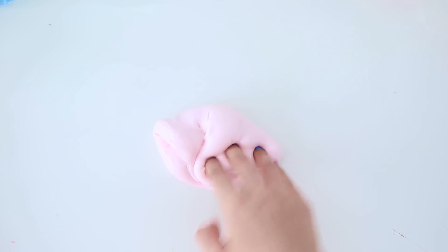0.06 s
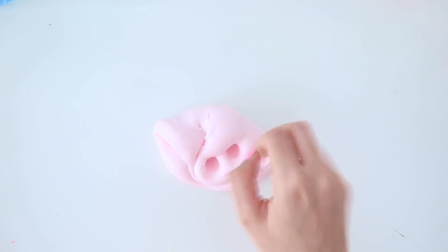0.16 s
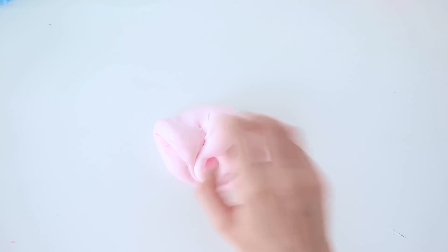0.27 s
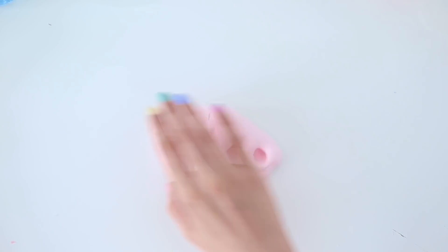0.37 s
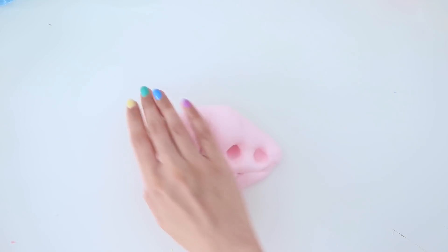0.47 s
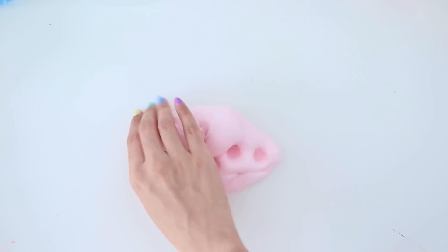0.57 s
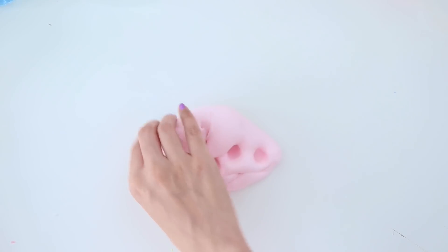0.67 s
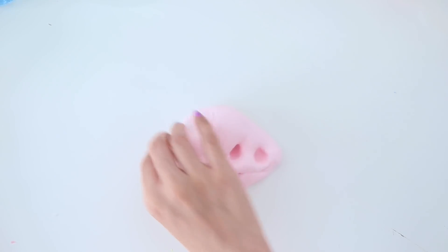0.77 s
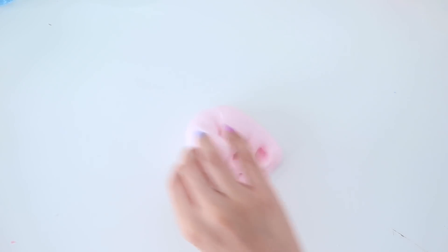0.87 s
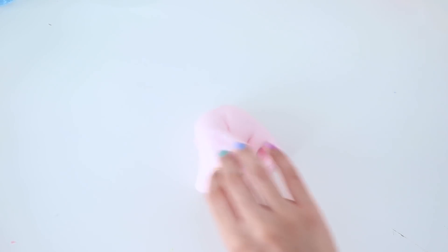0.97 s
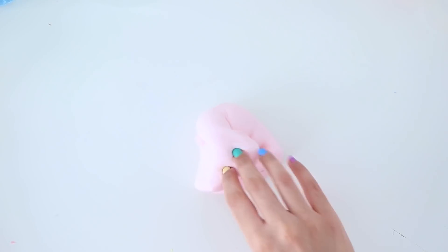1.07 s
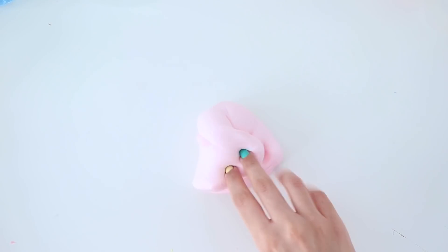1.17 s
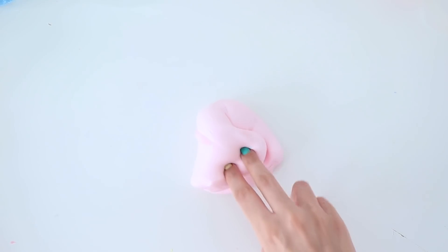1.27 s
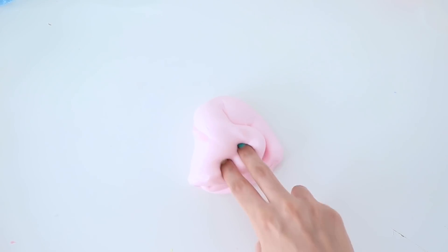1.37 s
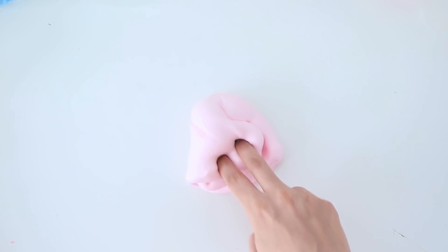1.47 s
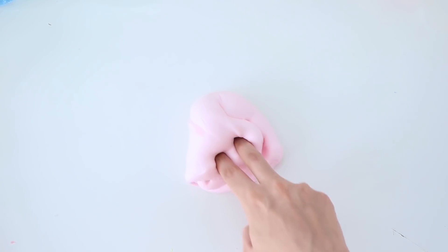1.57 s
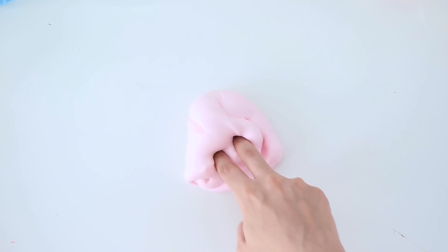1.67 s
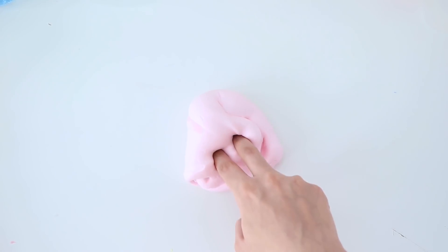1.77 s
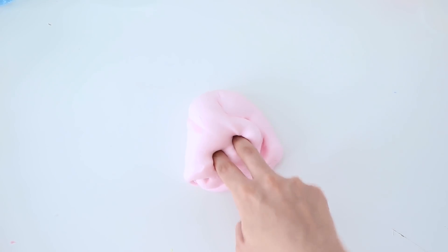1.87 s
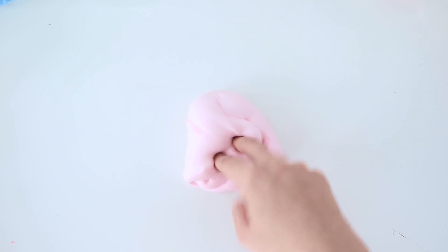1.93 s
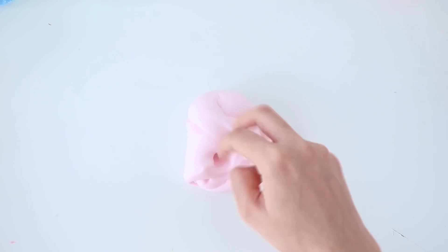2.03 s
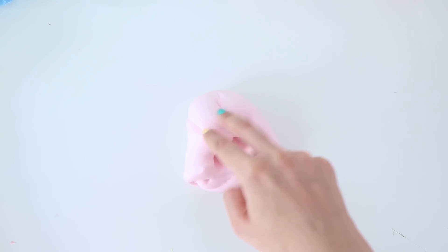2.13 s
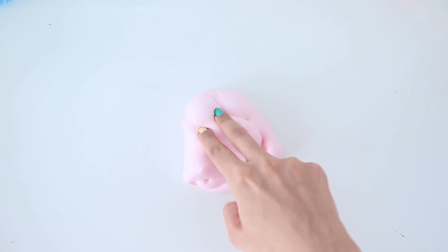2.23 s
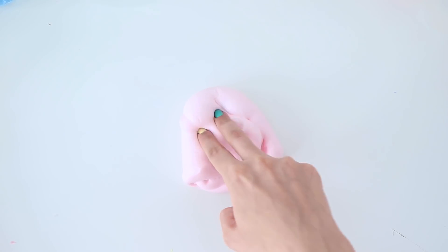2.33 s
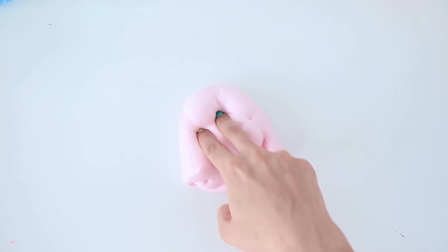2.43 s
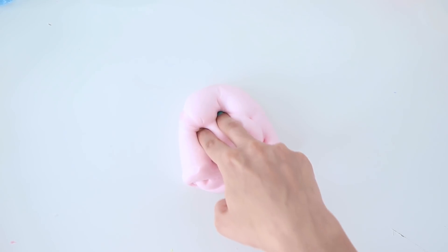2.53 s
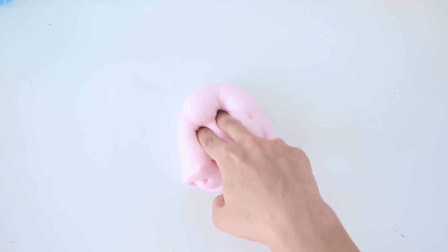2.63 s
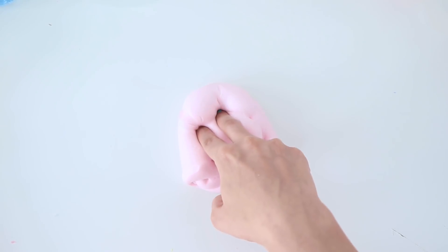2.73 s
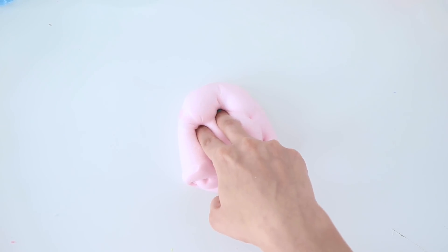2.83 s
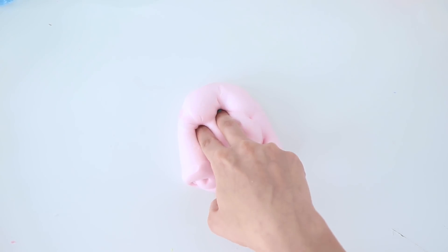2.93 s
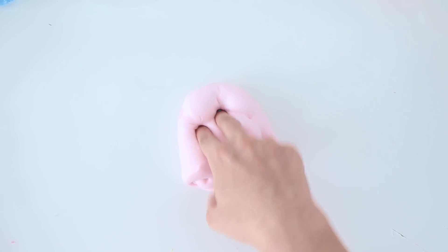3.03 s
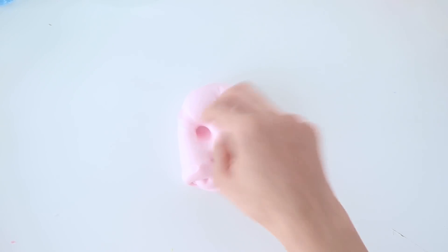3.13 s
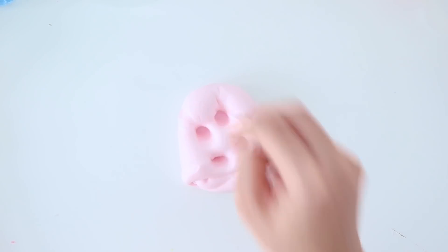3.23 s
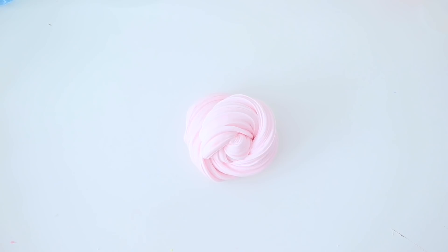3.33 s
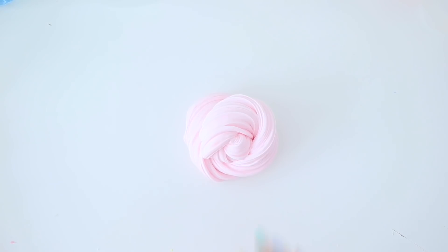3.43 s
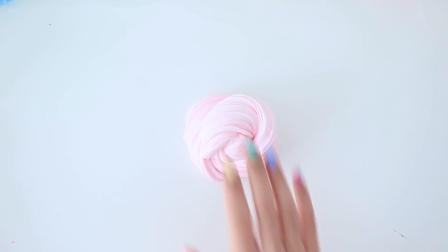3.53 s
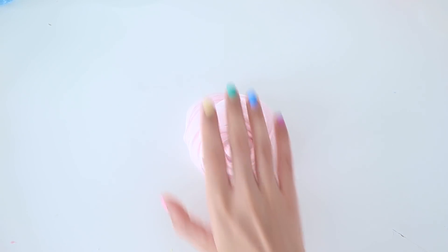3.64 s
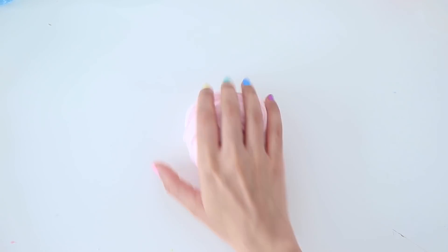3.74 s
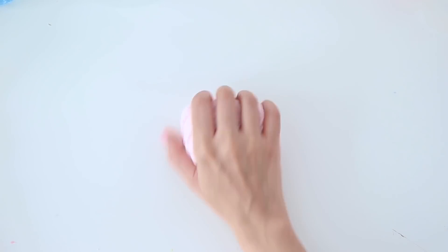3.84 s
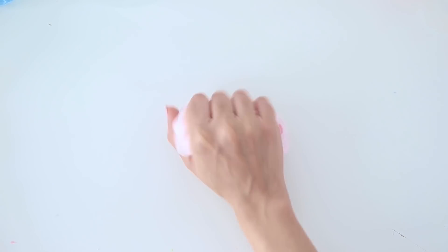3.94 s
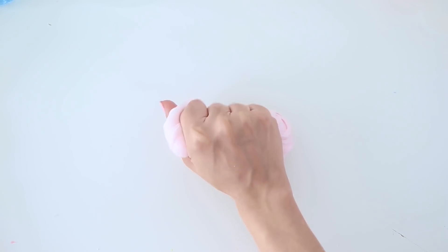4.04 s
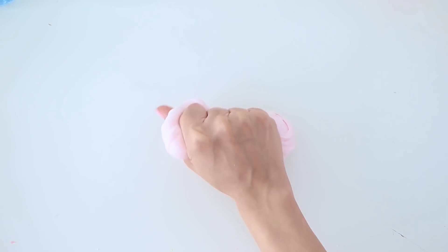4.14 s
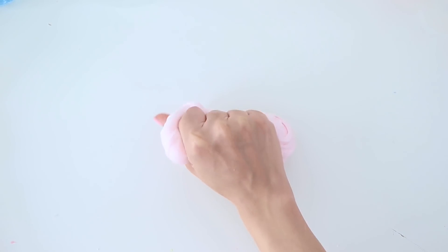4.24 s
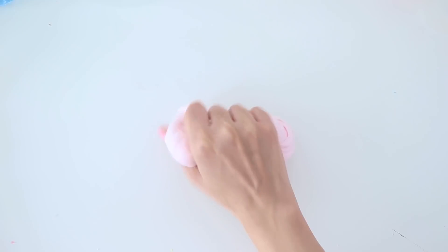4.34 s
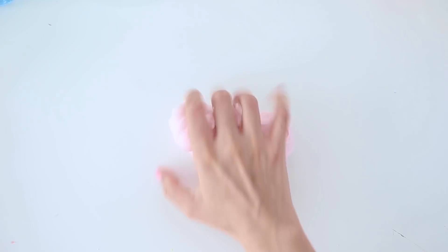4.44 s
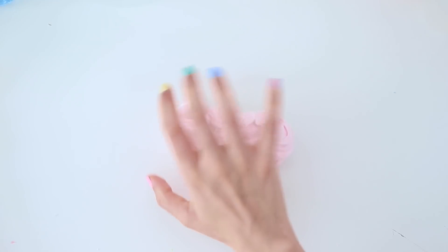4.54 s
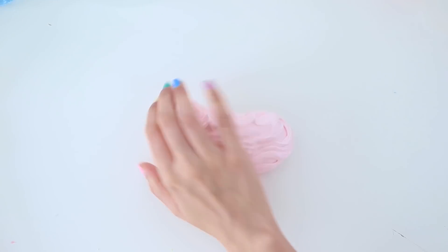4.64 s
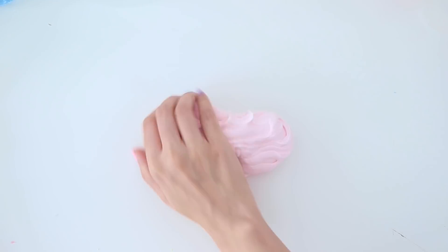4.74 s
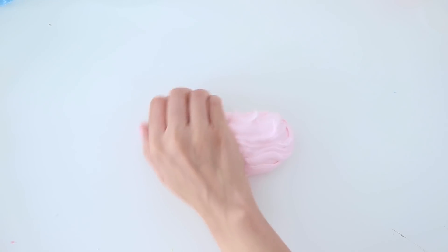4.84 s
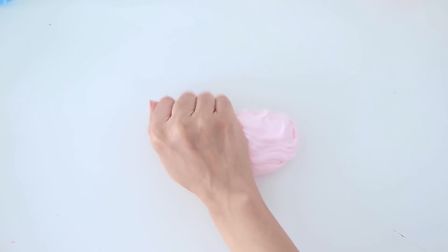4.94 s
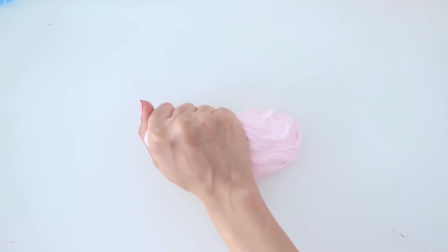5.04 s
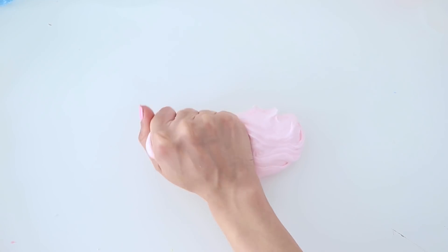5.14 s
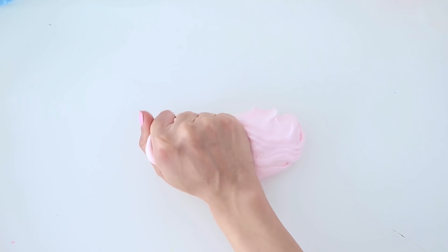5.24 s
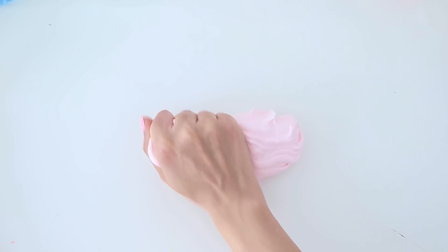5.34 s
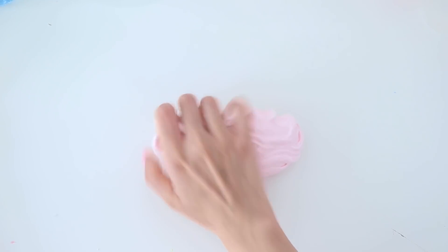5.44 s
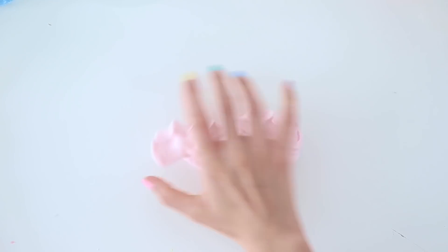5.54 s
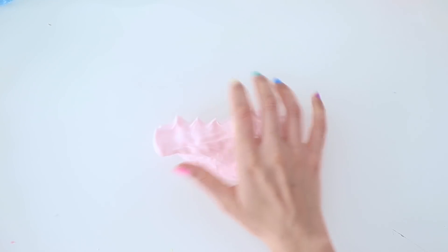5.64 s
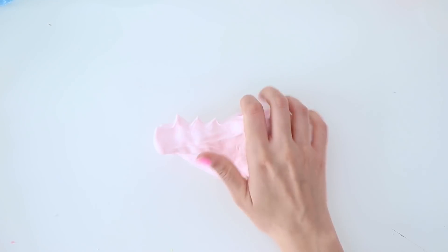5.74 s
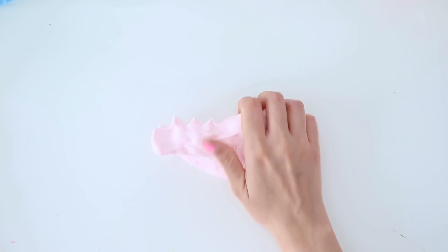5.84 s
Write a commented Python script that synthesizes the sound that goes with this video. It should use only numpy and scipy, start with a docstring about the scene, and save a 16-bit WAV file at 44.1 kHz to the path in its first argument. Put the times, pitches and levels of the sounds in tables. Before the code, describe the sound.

Close wet squelches and bursting air pockets from kneaded slime, sparse at first then dense and snappy, with soft tabletop thuds and faint mains hum.

```python
"""Slime squeezed on a hollow table.

A hand pokes, squeezes and peels soft slime close to a microphone. Air pockets burst as short gliding
rings with noisy cracks; smearing strokes swell a hiss of random tears and plops; finger holes hiss
through resonances. Fingertips knock decaying table modes, the table rocks as low resonant noise, and
a steady mains tone with two faint whines lies over coloured air noise in a small echoing room."""
import sys
import numpy as np
from scipy import signal
from scipy.fft import rfft, irfft
from scipy.io import wavfile
from scipy.ndimage import uniform_filter1d

SR = 44100
rng = np.random.default_rng(int(sys.argv[2]) if len(sys.argv) > 2 else 0)


def generate_wav(signal):
    """Clip the signal to [-1, 1] and save it as 16-bit WAV at the path in sys.argv[1]."""
    frames = np.transpose(np.atleast_2d(signal))
    scaled = np.clip(frames, -1, 1) * 32767
    pcm = np.round(scaled).astype(np.int16)
    wavfile.write(sys.argv[1], SR, pcm)


N = 260175


def gain_of(db):
    """Amplitude factor of a level in dB."""
    return 10 ** (np.asarray(db) / 20)


def evened(x):
    """Scales x to rms 1."""
    return x / np.sqrt(np.mean(x ** 2) + 1e-20)


def read(points, hz):
    """Interpolates a (Hz, value) table over log frequency."""
    point_hz, value = np.transpose(points)
    return np.interp(np.log(hz + 1), np.log(point_hz + 1), value)


def add(mix, start_s, sound):
    """Adds a sound into the mix in place, cut at the end."""
    part = mix[round(start_s * SR):][:len(sound)]
    part += sound[:len(part)]


def coloured(x, db_of_hz):
    """Shapes the spectrum of x by a dB curve over frequency."""
    hz = np.fft.rfftfreq(len(x), 1 / SR)
    return irfft(rfft(x) * gain_of(db_of_hz(hz)), len(x))


def resonate(x, hz, width_hz):
    """One resonance of gain 1, from a complex pole."""
    pole = np.exp((2j * np.pi * hz - np.pi * width_hz) / SR)
    return 2 * signal.lfilter([1 - abs(pole)], [1, -pole], x).real


def swell(peak_s, rise_s, hold_s, fall_s):
    """Climbs 30 dB in the rise time, holds, and sinks 30 dB in the fall time."""
    t = np.arange(N) / SR
    before = (peak_s - t) / rise_s
    after = (t - peak_s - abs(hold_s)) / fall_s
    return gain_of(-30 * np.maximum(np.maximum(before, after), 0))


# Spectrum of the air noise. Each row: frequency in Hz, relative density in dB per Hz.
AIR_SPECTRUM = [(25, -21.5), (55, 0.5), (85, -7), (105, -17), (180, -12), (205, -6), (235, -13.5),
                (400, -24), (1000, -31), (1400, -34.5), (5000, -40.5), (13500, -45.5), (14500, -46.5),
                (16000, -79.5)]
# Pitches of the faint whines, in Hz.
WHINES_HZ = [985, 1408]
MAINS_HZ = 120.1
AIR_RMS_DB, HUM_RMS_DB, WHINE_RMS_DB = -61.5, -54.5, -88.5  # the last for each whine


def background():
    """Smooth air noise under a steady mains sine and two whines of narrow-band noise."""
    t = np.arange(N) / SR
    air = evened(coloured(rng.standard_normal(N), lambda f: read(AIR_SPECTRUM, f)))
    hum = np.sqrt(2) * np.sin(2 * np.pi * MAINS_HZ * t)
    whines = sum(evened(resonate(rng.standard_normal(N), hz, 5.7)) for hz in WHINES_HZ)
    return gain_of(AIR_RMS_DB) * air + gain_of(HUM_RMS_DB) * hum + gain_of(WHINE_RMS_DB) * whines


# Swells of the table's low rocking on its legs. Each row: peak in seconds, rise in seconds, fall in seconds,
# level in dB.
SWAYS = [(.1, 0.13, 0.16, -40), (.57, 0.47, 1.7, -57), (1.94, 0.09, 0.22, -41), (3.09, 0.11, 0.24, -41.5),
         (3.83, 0.12, .23, -38), (4.45, .35, 0.88, -45), (5.47, 0.27, .13, -48), (5.9, 0.91, .1, -62)]
REST_DB = -76  # rocking at rest


def sway():
    """A low, loose rocking mode, noise through two 31 Hz resonances, swelling at times."""
    rocking = resonate(resonate(rng.standard_normal(N), 31, 16), 31, 16)
    local_power = uniform_filter1d(evened(rocking) ** 2, size=2800)
    rocking = rocking / np.sqrt(local_power + .15)  # it rarely dies out
    weight = gain_of(REST_DB)
    for peak_s, rise_s, fall_s, db in SWAYS:
        weight = weight + gain_of(db) * swell(peak_s, rise_s, 0, fall_s)
    return weight * evened(rocking)


# Modes of the table top. Each row: frequency in Hz, relative level in dB, 60 dB decay in seconds.
TABLE_MODES = [(293.8, 3.5, 0.18), (366.7, -3.5, 0.13), (780, -6.5, 0.19), (1206, -17, 0.074),
               (539.6, -14, 0.0043)]


def table_ring(size=12000):
    """The modes of the table top after one blow, decaying sines with peak 1."""
    t = np.arange(size) / SR
    ring = sum(gain_of(db - 60 * t / t60_s) * np.sin(2 * np.pi * hz * t)
               for hz, db, t60_s in TABLE_MODES)
    return ring / abs(ring).max()


# Fingertips pushing through to the table.
# Each row: start in seconds, ring gain in dB before the soft touch, thud gain in dB before its decay.
KNOCKS = [(.052, -34.5, -30.5), (.064, -29, -25.5), (0.106, -70, -28.5), (0.379, -34.5, -27.5),
          (.528, -47, -39), (.586, -63, -37), (.667, -45.5, -72), (1.9013, -45, -29.5), (1.9098, -50, -35),
          (1.9209, -47, -28.5), (3.055, -30.5, -47), (3.855, -42.5, -67), (3.927, -48, -52),
          (4.004, -32, -77), (4.273, -42.5, -63), (4.305, -46, -65), (4.374, -40.5, -39),
          (4.66, -48.5, -38), (4.723, -28.5, -29), (4.985, -32, -39), (5.066, -35.5, -36.5),
          (5.313, -38, -60), (5.724, -35, -72), (5.885, -30.5, -34.5)]
TOUCH_S = 0.0018


def knocks():
    """Each fingertip rings the table top, dulled by its soft touch, and gives a short low thud."""
    out, t = np.zeros(N), np.arange(3000) / SR
    thud = np.sin(2 * np.pi * 130 * t) * np.exp(-t / 0.003)
    blow = np.hanning(3 + round(TOUCH_S * SR))
    ring = np.convolve(table_ring(), blow / blow.sum())
    for start_s, ring_db, thud_db in KNOCKS:
        add(out, start_s, -gain_of(ring_db) * ring)
        add(out, start_s, -gain_of(thud_db) * thud)
    return out


# Finger holes in the slime.
# Each row: start in seconds, end in seconds, cavity note in Hz, rms in dB before the fades.
HOLLOWS = [(0.394, 0.557, 2260, -67), (0.393, 0.494, 3100, -68), (0.586, 0.61, 4590, -49),
           (4.346, 4.442, 2180, -56.5), (5.356, 5.436, 1080, -54), (5.728, 5.788, 3930, -61),
           (1.346, 1.405, 1380, -69)]


def hollows():
    """Air hissing past a hole rings its small cavity: faded noise through one resonance."""
    out = np.zeros(N)
    for start_s, end_s, hz, db in HOLLOWS:
        hiss = rng.standard_normal(round(.2 * SR))[:round((end_s - start_s) * SR)]
        ringing = evened(resonate(hiss, hz, 0.076 * hz))
        add(out, start_s, gain_of(db) * ringing * signal.windows.tukey(len(hiss), .5))
    return out


def random_hits(per_s):
    """Impulses at random times, their sizes spread over 0 to 13.5 dB."""
    sizes = gain_of(4.5 * np.minimum(rng.exponential(1, N), 3))
    return sizes * (rng.random(N) < per_s / SR)


def smear_drive():
    """Uneven wet hiss, dense where small films tear, with tiny pockets plopping at 12 pitches."""
    tears = signal.oaconvolve(random_hits(500), np.exp(-np.arange(300) / 40.))[:N]
    lumps = evened(uniform_filter1d(rng.standard_normal(N), 500))
    hiss = rng.standard_normal(N) * (gain_of(2.5 * lumps) + .5 * evened(tears))
    kind, hits = rng.integers(0, 12, N), random_hits(400)
    t, plops = np.arange(400) / SR, np.zeros(N)
    for k, hz in enumerate(np.geomspace(700., 7000., 12)):
        plop = np.sin(2 * np.pi * hz * t) * np.exp(-t * hz / 6.1)
        plops += signal.oaconvolve(hits * (kind == k), plop)[:N]
    thin_plops = signal.lfilter([1, -.9], [1], plops)  # less bass
    return evened(hiss) + 0.25 * evened(thin_plops)


# Smearing strokes.
# Each row: peak in seconds, rise in seconds, hold in seconds, fall in seconds, crackle level in dB,
# brightness in dB on the crackle, depth in dB on the crackle, pressure on the table in dB.
STROKES = [(0.059, .03, 0.0017, 0.02, -44, -2, 4, -69), (0.08, .02, .002, 0.15, -60.5, 1, 17, -57),
           (0.378, .006, .002, 0.072, -51.5, -13, 7, -49), (0.413, .03, 0.11, 0.034, -71.5, -36, -4, -67),
           (0.59, .012, 0.017, 0.011, -48.5, -4, -29, -72), (0.722, .4, .002, 0.33, -65, 8.5, 8.5, -68.5),
           (0.77, 0.038, 0.013, 0.11, -85, 19, -6, -68.5), (1.889, 0.064, 0.013, .03, -58, 2, 8, -62),
           (1.905, 0.0056, 0.0078, 0.077, -55.5, 3.5, 12, -52),
           (3.043, .06, 0.0069, 0.068, -59.5, 10.5, 14, -67),
           (3.792, .02, 0.064, 0.034, -52, 0.5, -8.5, -63.5), (3.865, .03, 0.12, 0.06, -57.5, 8, 12, -51.5),
           (4.012, .01, 0.0019, 0.13, -43.5, 6, -1, -63.5), (4.088, .05, .12, 0.11, -70.5, -11, -3, -84),
           (4.279, .05, 0.14, 0.042, -56.5, 0, 4.5, -57.5), (4.281, 0.014, .015, 0.086, -61.5, -3, 10, -53),
           (4.671, .02, 0.058, 0.023, -73, 9, -4.5, -71.5), (4.723, .01, .002, 0.23, -51, -3.5, -16, -76),
           (4.95, .3, 0.073, .05, -53.5, 6.5, -11, -54), (4.91, 0.035, 0.0088, 0.035, -69, 1, 3, -55.5),
           (5.071, .04, .002, 0.33, -58, 13.5, -13, -57.5),
           (5.183, .03, 0.036, 0.07, -76, 25.5, -14.5, -82),
           (5.306, .07, .002, 0.079, -48.5, -13.5, -1.5, -53.5),
           (5.374, .06, 0.0022, 0.11, -49.5, -4, 4, -51.5), (5.402, .05, 0.042, .03, -68, 14.5, -7, -68.5),
           (5.699, .04, .02, .02, -68.5, -8, 12.5, -75), (5.726, .008, .002, 0.24, -51, -5, -6, -64),
           (5.897, .06, 0.0018, .02, -47.5, -10, 1, -68)]
# Spectrum of the smearing. Each row: frequency in Hz, relative density in dB per Hz.
SMEAR_SPECTRUM = [(300, -10.5), (500, 0), (900, 1), (1700, 1), (2400, 2), (4000, -2), (6800, -10.5),
                  (9000, -9), (14500, -21.5), (16500, -30.5)]
LUMP_RMS_DB = 3  # slow unevenness of each band


def smear():
    """Strokes swell three bands of tearing noise; the same strokes shake the table modes."""
    out, push = np.zeros(N), np.zeros(N)
    drive = smear_drive()
    heave = evened(uniform_filter1d(uniform_filter1d(rng.standard_normal((3, N)), 900), 900))

    def below(f, hz):
        return 1 / (1 + (f / hz) ** 4)

    def band(power_share):
        return coloured(drive, lambda f: read(SMEAR_SPECTRUM, f) + 10 * np.log10(power_share(f)))

    deep = band(lambda f: below(f, 490))
    middle = band(lambda f: below(f, 6500) * below(580, f + 1))
    bright = band(lambda f: below(6500, f + 1))
    deep, middle, bright = np.array([deep, middle, bright]) * gain_of(LUMP_RMS_DB * heave)
    scale = np.std(middle)
    for *shape, db, bright_db, deep_db, table_db in STROKES:
        stroke = swell(*shape)
        crackle = middle + gain_of(bright_db) * bright + gain_of(deep_db) * deep
        out += gain_of(db) * stroke * crackle / scale
        push += gain_of(table_db) * stroke
    shaken = evened(signal.oaconvolve(drive, table_ring())[:N])
    return out, shaken * uniform_filter1d(push, 400)


# Bursting air pockets.
# Each row: start in seconds, ring peak in dB, starting note in Hz, crack gain in dB,
# depth of the crack in dB on its middle, brightness of the crack in dB on its middle.
POPS = [(.054, -33.5, 1730, -22, -17, -16), (0.0624, -48, 2620, -30.5, -5, -6),
        (.0893, -38, 5500, -34.5, 0, -8), (0.379, -71, 1270, -35, 2.5, -67),
        (0.6367, -56, 1020, -45.5, -21, -40), (0.6662, -58, 5490, -56, 8, -11),
        (0.709, -60, 850, -49.5, 4.5, -4), (.7633, -57, 3570, -61, -2, -6),
        (0.787, -56, 4290, -52, -13, -12), (0.9814, -59, 2500, -50.5, -4, 1),
        (1.0949, -70, 2800, -46, -9, -3), (1.3512, -45.5, 1090, -44.5, 4, -7),
        (1.869, -57.5, 1570, -57, 3, -25), (1.9018, -45, 1104, -35.5, -27, -12),
        (2.2036, -70, 2540, -57.5, -14, -6), (2.4197, -52.5, 830, -39.5, -14.5, -39),
        (2.996, -63, 7000, -65, -17, 3), (3.012, -69, 6000, -62, -15, 2), (3.025, -65, 2970, -48, -6, -15),
        (3.0529, -48.5, 2470, -36, -2, -8.5), (3.095, -67, 2500, -56, -3, -18),
        (3.696, -67, 3180, -62, -15, -17), (3.7165, -67, 3940, -64.5, -7, -9),
        (3.7267, -65, 2300, -58, -15, -6), (3.7438, -62, 2450, -56.5, -10.5, 2),
        (3.7629, -62, 4370, -51, -14.5, -18), (3.778, -48.5, 2490, -44, -0.5, -8),
        (3.7867, -45, 5240, -45.5, -11.5, -12.5), (3.797, -49.5, 4590, -50.5, -2, -4.5),
        (3.808, -44, 6600, -35, -22.5, -16), (3.8287, -45.5, 2600, -42, 3, 0.5),
        (3.8562, -40.5, 4690, -26, -7.5, -5), (3.8635, -37.5, 2330, -29, -2.5, -0.5),
        (3.911, -55, 3250, -35.5, -8.5, -1), (3.9298, -33, 2320, -29.5, -5, -10.5),
        (3.945, -30.5, 2560, -33, -17, -41.5), (3.952, -24.5, 2400, -27, -24.5, -25),
        (3.9839, -29.5, 4410, -20, -19, -0.5), (4.0065, -21, 2840, -6, -9.5, -12),
        (4.073, -32, 2220, -39, -12.5, -14), (4.107, -56, 3500, -48, -6, 2),
        (4.2685, -58, 1930, -58.5, 22, -16), (4.3054, -45, 2730, -48, 13, 4),
        (4.376, -42, 2065, -44.5, 8.5, -12), (4.662, -64, 1210, -49, 4, -37),
        (4.7242, -40.5, 1150, -26, 6.5, -24), (4.755, -53, 1110, -51, 0, -21),
        (4.7813, -52, 1080, -44.5, -4, -12.5), (4.8024, -49.5, 3020, -44.5, -14, -4.5),
        (4.8528, -44, 1890, -44.5, 0.5, -19.5), (4.8766, -37, 5170, -36.5, -4.5, -8.5),
        (4.8875, -46, 2150, -34.5, -15.5, -27), (4.8994, -39, 5200, -30, -18.5, -14.5),
        (4.9057, -36.5, 4930, -34.5, -14, -8), (4.914, -43.5, 5300, -41.5, -9.5, -11),
        (4.937, -36, 2160, -30, -18, -11), (4.9566, -45, 910, -36, -4.5, -5),
        (4.9686, -38.5, 1930, -29.5, -21, -16), (4.9789, -40.5, 990, -29.5, -2.5, -28.5),
        (4.9854, -36, 3120, -27.5, -1.5, -23.5), (4.9884, -20.5, 2910, -21, -28, 2.5),
        (5.0001, -44, 3000, -35.5, -14, -27), (5.008, -41, 3510, -37.5, 4, -9.5),
        (5.029, -38, 3440, -36, -19.5, -17.5), (5.0415, -20, 2500, -16.5, -22.5, -11.5),
        (5.0683, -14, 13870, -25.5, 3.5, 21), (5.102, -20, 9940, -18, -8, -0.5),
        (5.1764, -24, 5130, -14, -25, 0), (5.362, -60, 830, -47, 11.5, 5), (5.372, -40, 1300, -52, -5, -9),
        (5.3759, -41, 955, -42, 5.5, -15), (5.3835, -46, 1810, -42, -2, -19),
        (5.6951, -59, 2850, -61, 1, -27), (5.7248, -43, 1120, -43, 5.5, -11),
        (5.8319, -64, 2860, -55, -10, 4), (5.8508, -44, 1910, -36.5, -5, -24),
        (5.8898, -58, 2450, -29, -28, -21)]
RING_S, RING_CYCLES = 0.0073, 15  # 60 dB decay: a fixed time plus cycles of the note
GLIDE_PER_S = 3.6  # stretches the phase, so the note climbs at twice this rate
CRACK_T60_S = 0.012
BRIGHT_SHARE = 0.27  # part of the brightness already reached at 6.8 kHz
CRACK_BANDS_HZ = (90, 300, 900, 2800, 6800, 12500, 16500)


def pocket_ring(t, hz):
    """The pocket swells into its note as the neck opens, then empties while the note climbs."""
    age = t / (.1 * (RING_S + RING_CYCLES / hz))
    return age * np.exp(1 - age) * np.sin(2 * np.pi * hz * t * (1 + GLIDE_PER_S * t))


def film_crack(noise, t, lead, crack_db, deep_db, bright_db):
    """A snap, then decaying flutter of the torn film, evened over frequency and coloured."""
    f = np.fft.rfftfreq(len(t), 1 / SR)
    film = noise * gain_of(-60 * t / CRACK_T60_S)
    film[0] = 3  # snap
    film = rfft(np.roll(film, lead))
    film /= np.sqrt(uniform_filter1d(abs(film) ** 2, size=45))  # every band gets its full share
    levels_db = [deep_db - 25.5, deep_db - 2, deep_db, 0,
                 BRIGHT_SHARE * bright_db, bright_db, bright_db - 10.5]
    colour_db = read(list(zip(CRACK_BANDS_HZ, levels_db)), f)
    tilt_db = 57.0 - 10 * np.log10(f + 300)
    crack = irfft(film * gain_of(crack_db + colour_db + tilt_db))
    return crack * signal.windows.tukey(len(t), .1)


def pops():
    """Each pocket rings for a few cycles while its torn film cracks."""
    out, t, lead = np.zeros(N), np.arange(1024) / SR, 64  # lead: samples before the snap
    noises = rng.standard_normal((len(POPS), len(t)))
    for (start_s, ring_db, hz, *crack), noise in zip(POPS, noises):
        add(out, start_s, gain_of(ring_db) * pocket_ring(t, hz))
        add(out, start_s - lead / SR, film_crack(noise, t, lead, *crack))
    return out


# Near reflections: table top, hand, ceiling twice.
# Each row: delay in seconds, gain in dB before the treble loss.
ECHOES = [(.0011, -28.5), (.0023, -35.5), (0.012, -21.5), (0.0223, -24)]
# Decay of the room. Each row: frequency in Hz, 60 dB decay in seconds.
ROOM_DECAY = [(300, 0.5), (1500, 0.25), (5000, .24), (14000, 0.046)]
TAIL_DB = -16.5  # energy of the tail before the treble loss


def room(x):
    """A few near reflections, then sparse taps that die band by band."""
    taps = np.zeros(SR // 2)
    at = np.arange(140, len(taps) - 20, 20)
    taps[at + rng.integers(0, 20, len(at))] = rng.choice([-1., 1.], len(at))
    hz, t, bands = signal.stft(taps, SR, nperseg=256)
    decay = gain_of(-60 * t / read(ROOM_DECAY, hz)[:, None])
    tail = signal.istft(bands * decay, SR, nperseg=256)[1]
    answer = gain_of(TAIL_DB) * tail / np.linalg.norm(tail)
    for delay_s, db in ECHOES:
        answer[round(delay_s * SR)] += gain_of(db)
    answer = signal.lfilter([.6], [1, -.4], answer)  # soft surfaces return less treble
    return x + signal.fftconvolve(x, answer)[:N]


def scene():
    """Slime sounds echo in the room; table sounds and background are added without echo."""
    crackle, shaken = smear()
    slime = room(pops() + crackle + hollows())
    return (slime + shaken + knocks() + sway() + background())[None]


EDGE_HZ = 16700


def record(dry):
    """The band limit: a linear-phase low-pass at EDGE_HZ."""
    low_pass = signal.firwin(255, EDGE_HZ, window=("kaiser", 9), fs=SR)
    return signal.oaconvolve(dry, low_pass[None], "same")


dry = scene()
out = record(dry)
generate_wav(out)
```